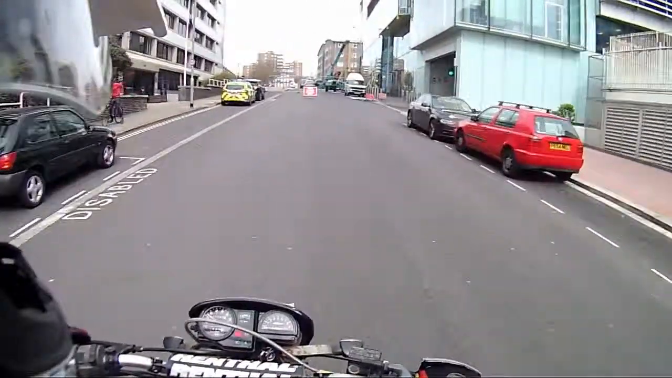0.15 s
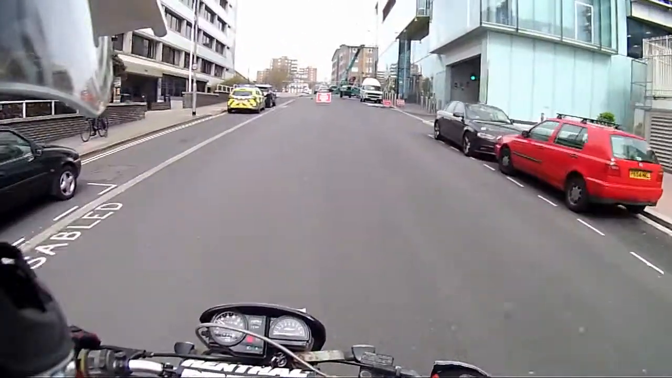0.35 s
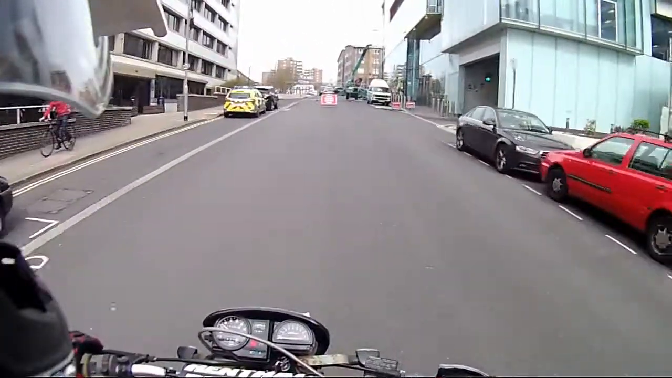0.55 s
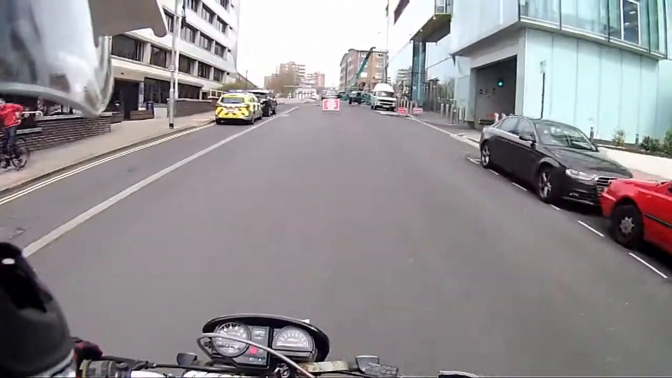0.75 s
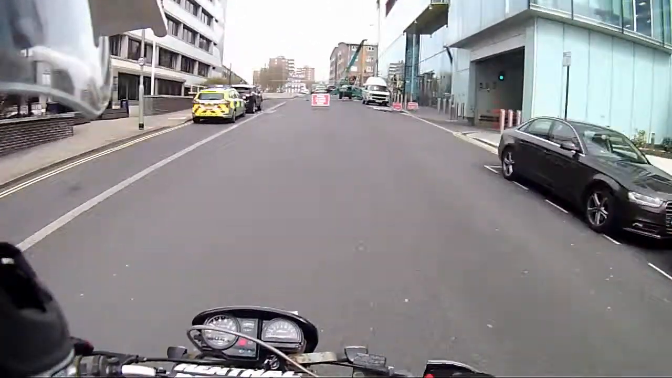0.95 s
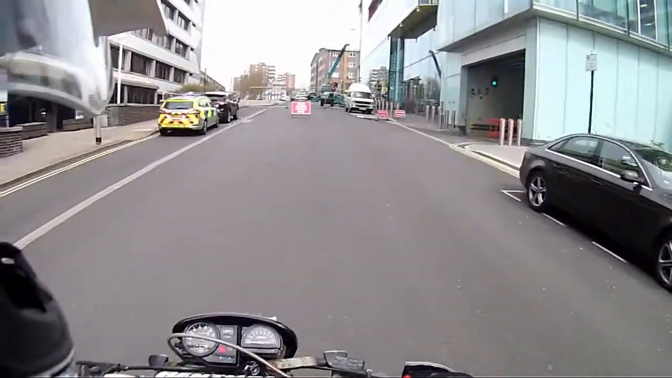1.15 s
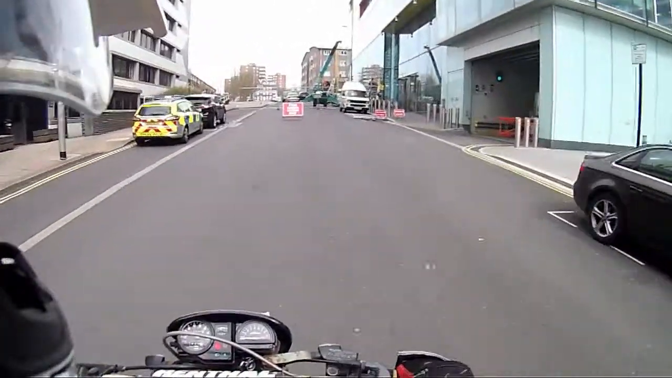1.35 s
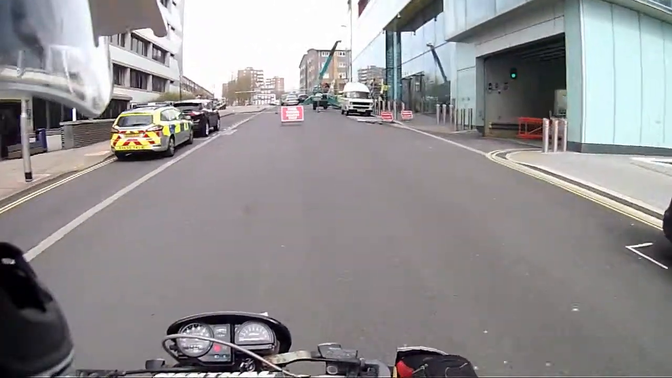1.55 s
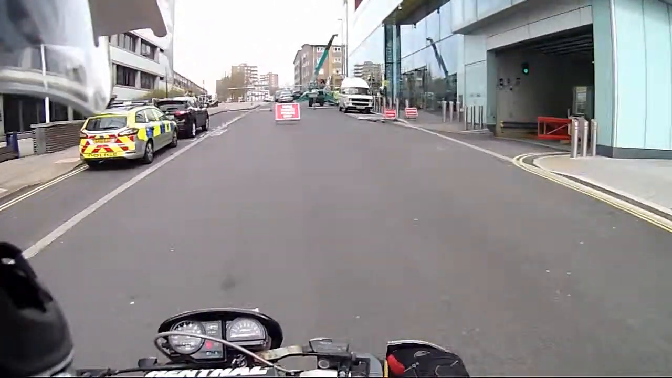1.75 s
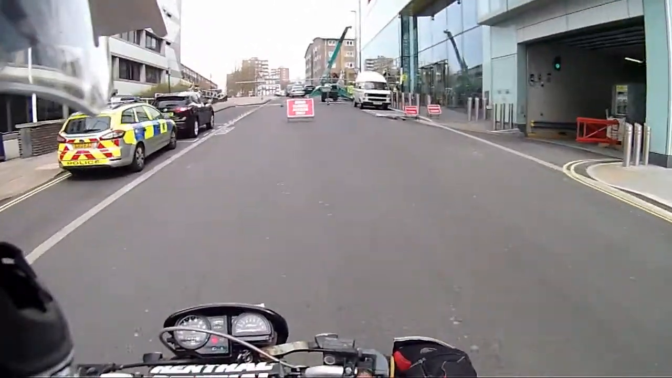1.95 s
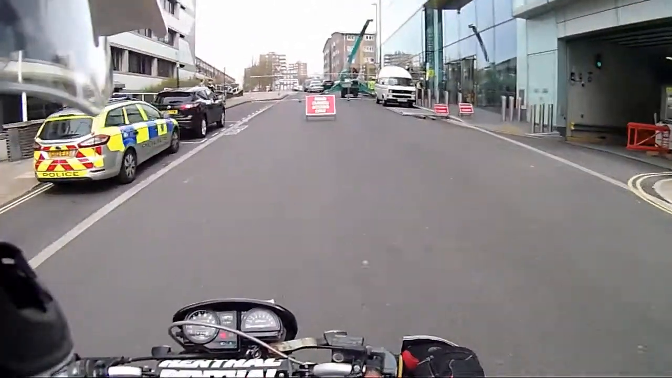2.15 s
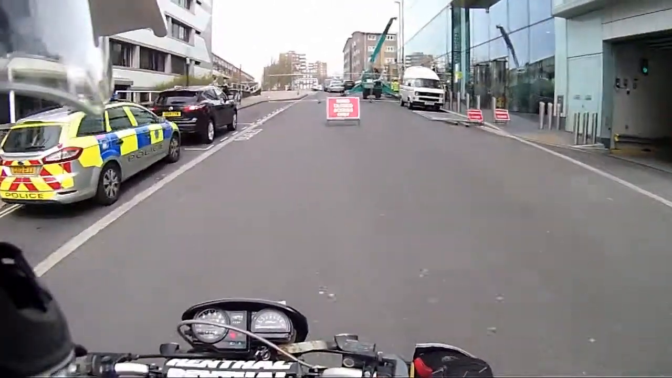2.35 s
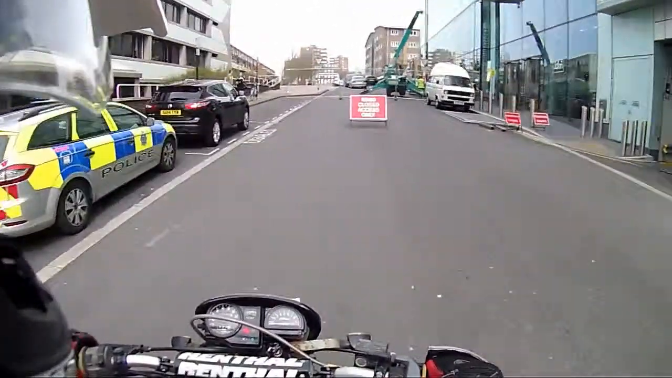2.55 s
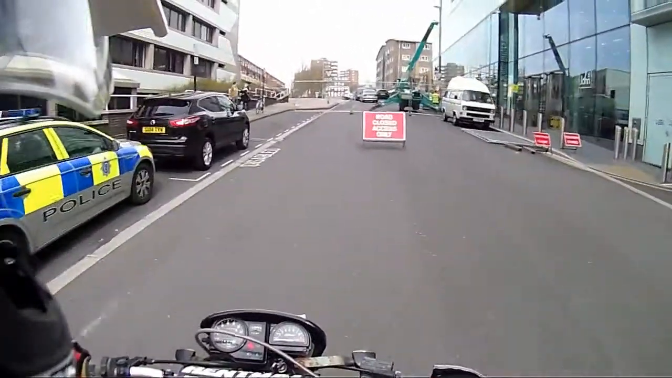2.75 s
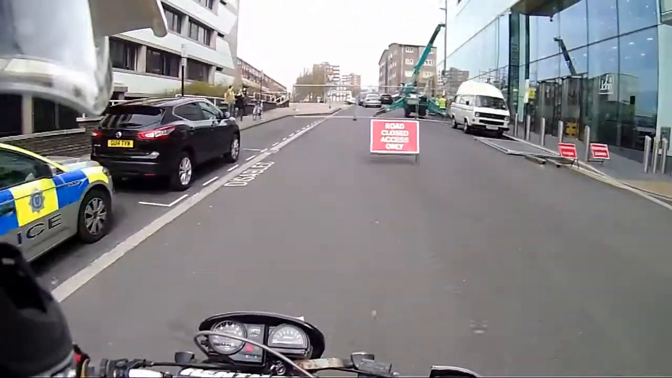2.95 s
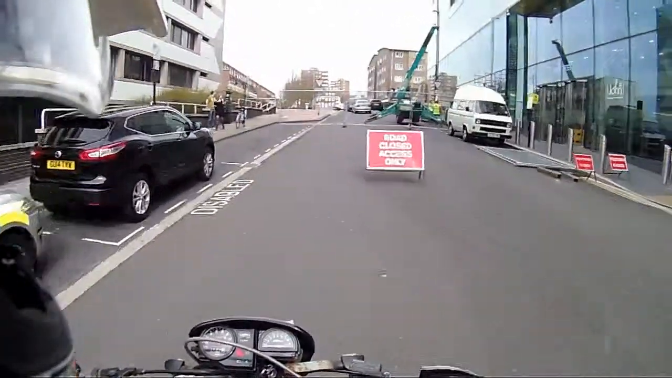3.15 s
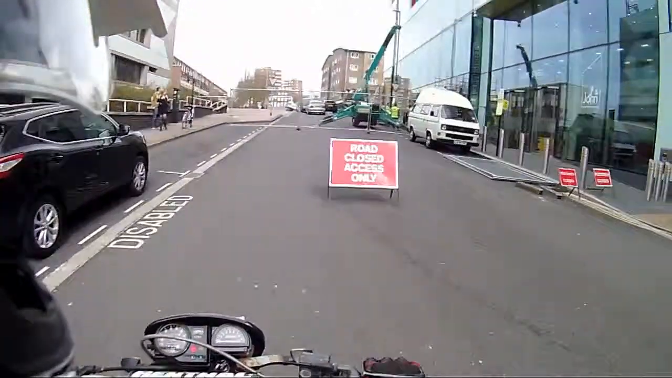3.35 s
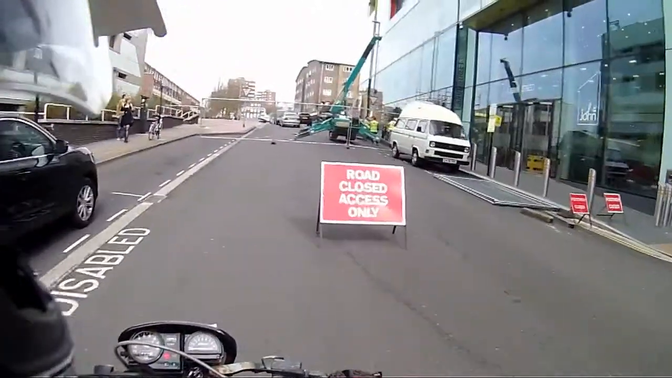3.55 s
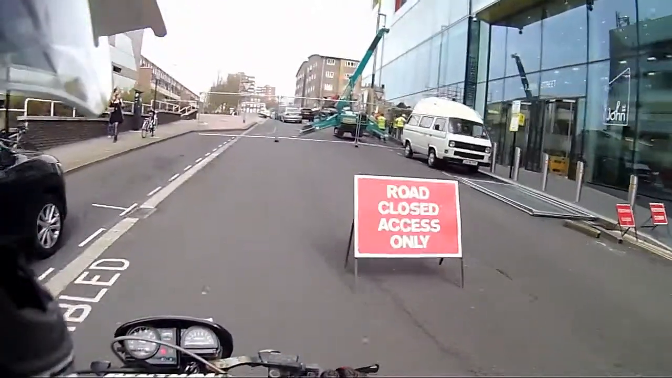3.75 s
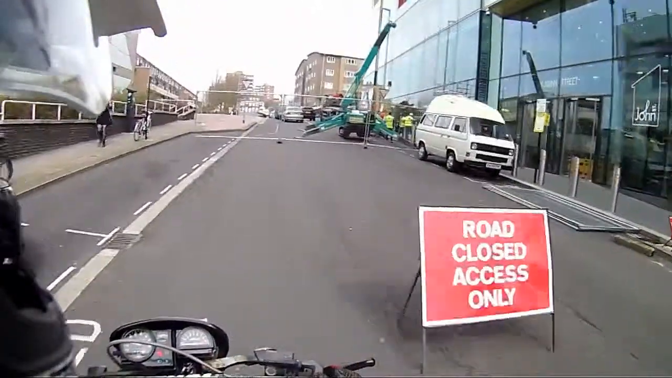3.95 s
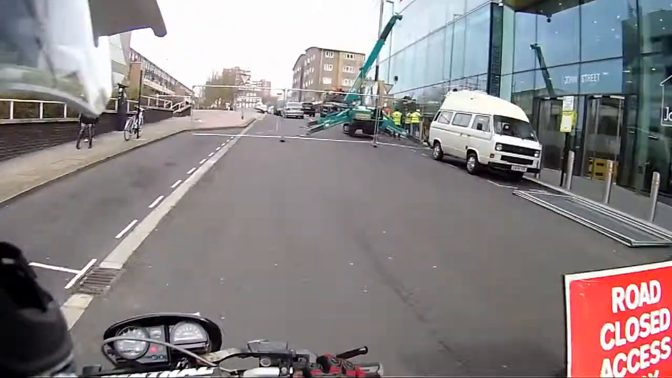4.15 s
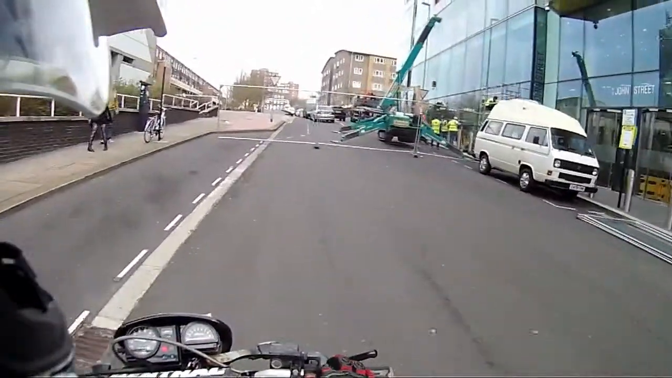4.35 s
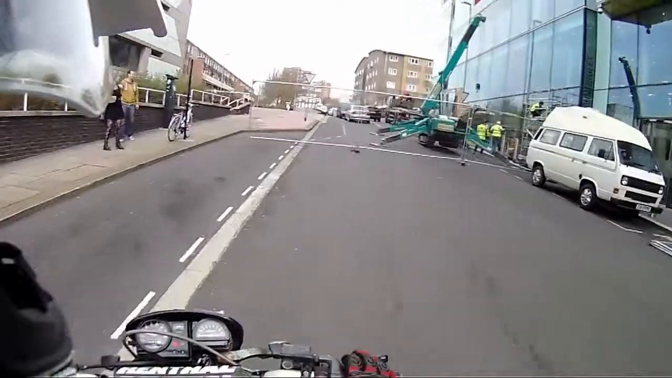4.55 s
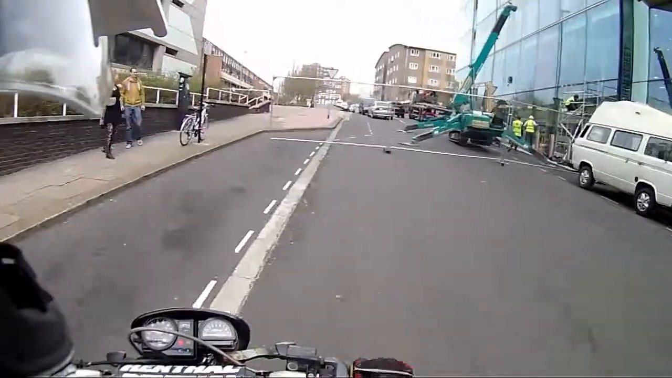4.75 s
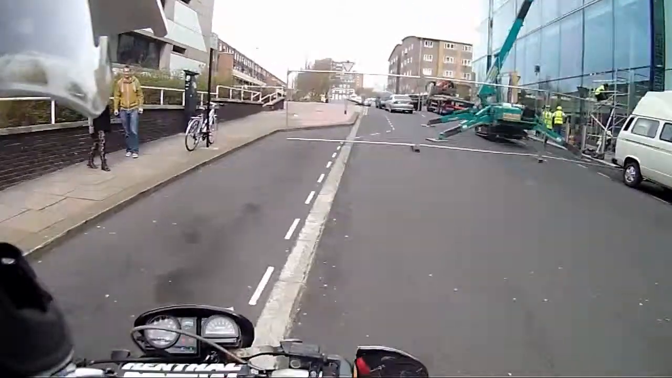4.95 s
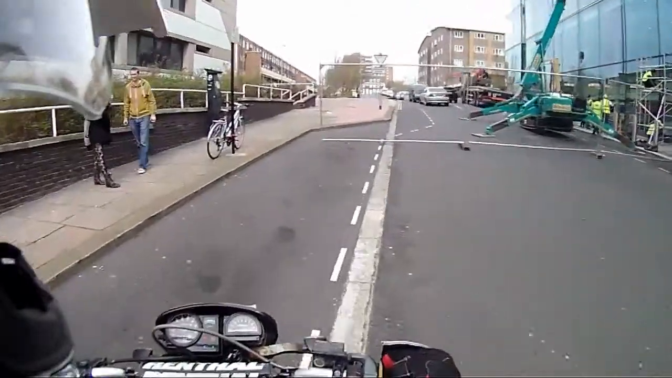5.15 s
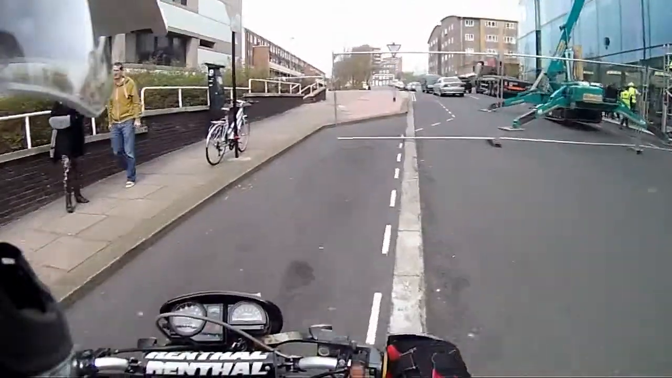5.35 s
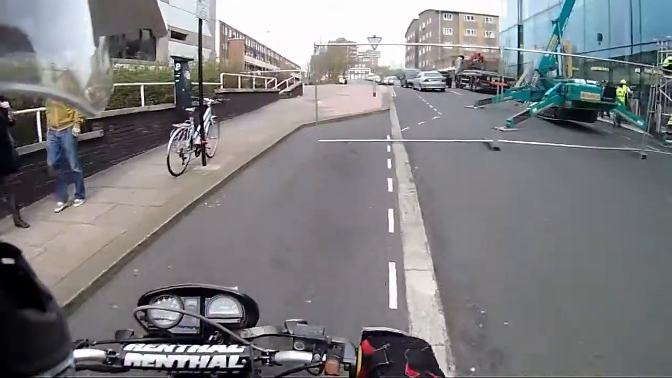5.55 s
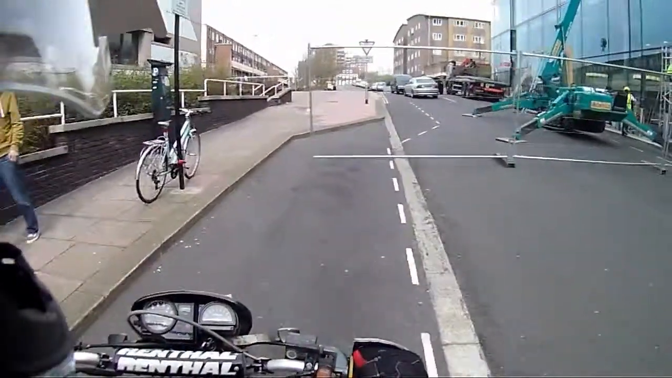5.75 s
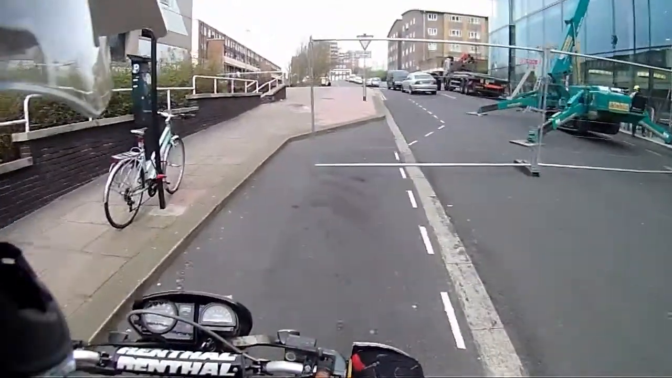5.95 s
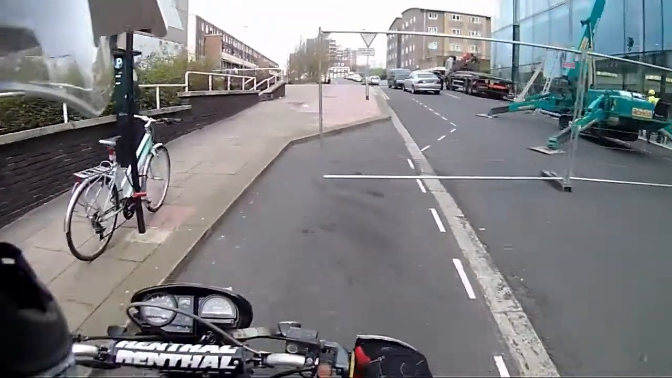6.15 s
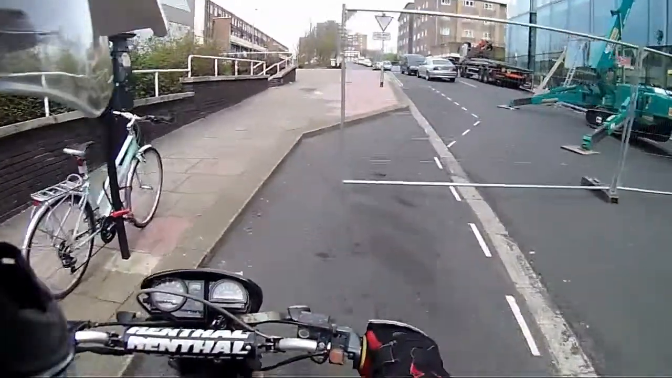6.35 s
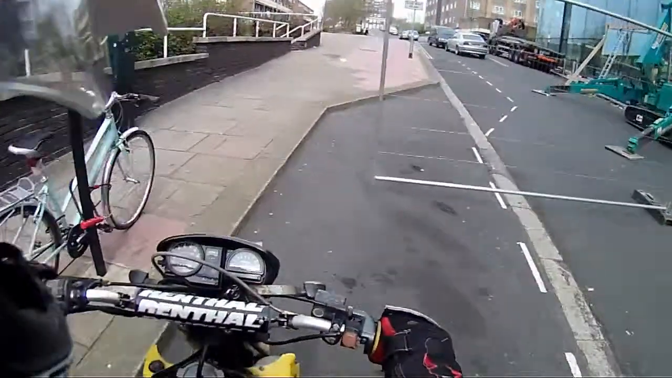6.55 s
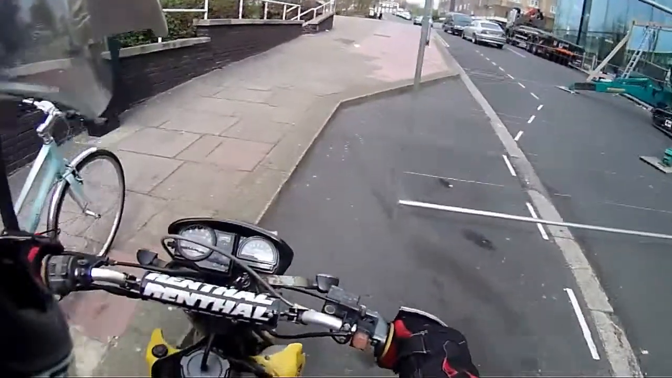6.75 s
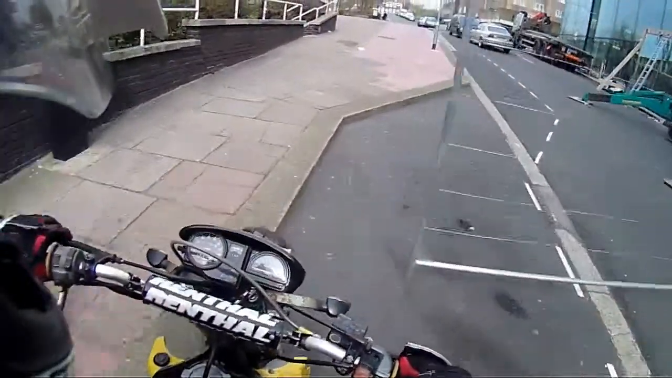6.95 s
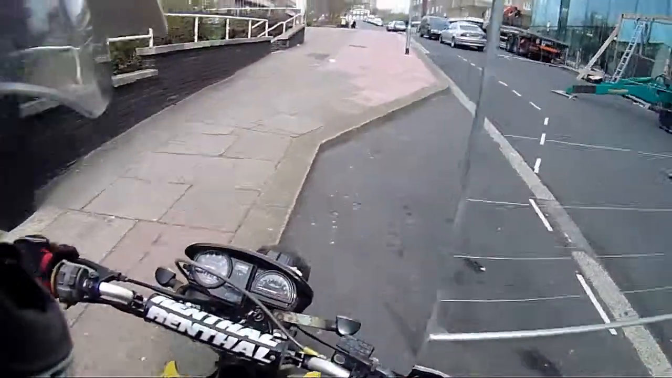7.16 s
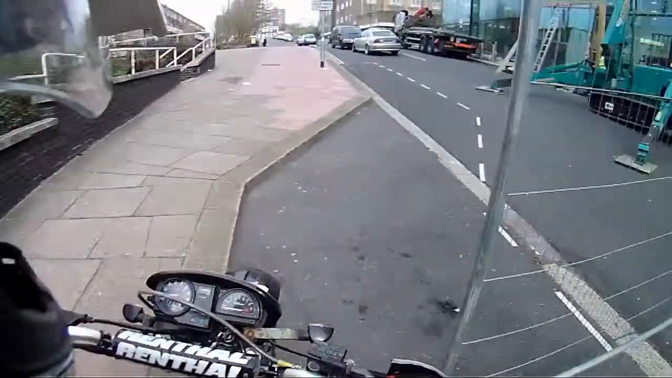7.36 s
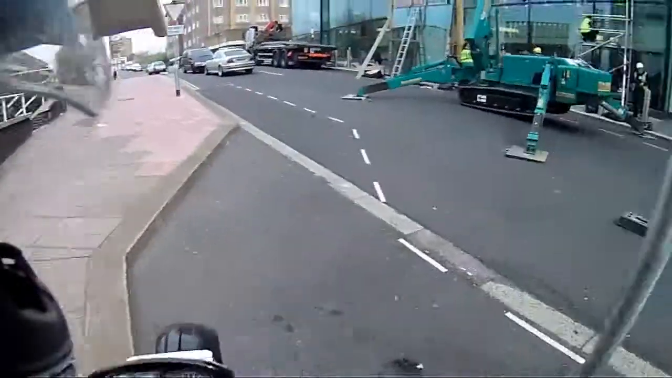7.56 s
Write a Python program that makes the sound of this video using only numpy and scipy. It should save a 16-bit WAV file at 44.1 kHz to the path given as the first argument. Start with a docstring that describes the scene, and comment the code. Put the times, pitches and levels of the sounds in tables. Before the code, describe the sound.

Wind rumbles in gusts on a rider's microphone as a motorcycle slows down on a town street. The engine hums and whines lower and lower, with tyre roar and small metallic ticks. Midway the brakes give a soft groan and hiss and the bike knocks over a bump. The engine drops to a low putter, and faint, thin brake squeaks come through as the wind eases.

```python
"""Motorcycle coasting and braking

A single-cylinder motorcycle slows down a city street, throttle shut, heard from the rider's helmet.
Crank harmonics filtered by pipe resonances, gear whine and valve clatter sink with the engine speed,
under eddies buffeting the microphone and tyre roar. Loose parts rattle and bumps thump; the clutch is
pulled, and brake friction rubs, groans and squeaks thinly. A faint distant town lies behind."""
import sys
import numpy as np
from scipy import signal
from scipy.fft import rfft, irfft
from scipy.io import wavfile
from scipy.ndimage import uniform_filter1d

SR = 44100
rng = np.random.default_rng(int(sys.argv[2]) if len(sys.argv) > 2 else 0)


def unload_audio(sound):
    """Save the sound as a 16-bit wav file, at the path given as the first command line argument."""
    columns = np.transpose(np.atleast_2d(sound))
    # keep every value between -1 and 1, then stretch to whole-number steps
    steps = np.round(np.clip(columns, -1, 1) * 32767)
    wavfile.write(sys.argv[1], SR, steps.astype(np.int16))


N = 335160
TIME = np.arange(N) / SR

# resonances of exhaust and airbox: f/Hz, width/Hz, level/dB
PIPE_MODES = [(232, 22, -1), (268, 24, 1.5), (308, 25, 1), (391, 25, -.5), (431, 31, -2), (478, 45, -6),
              (567, 34, .5), (627, 48, -1), (786, 57, -10)]


def undb(db):
    """Amplitude ratio of a level in decibels."""
    return 10 ** (np.asarray(db) / 20)


def unit(x):
    """Normalisation to rms 1."""
    return x / np.sqrt(np.mean(x ** 2))


def curve(table):
    """Linear interpolation of (t/s, value) rows at every sample."""
    return np.interp(TIME, *np.transpose(table))


def colour(x, points):
    """Spectral shaping by (f/Hz, level/dB) points, falling 12 dB an octave beyond them; rms 1."""
    hz, db = np.transpose(points)
    f = np.maximum(np.fft.rfftfreq(len(x), 1 / SR), 1)
    skirts = np.minimum(f / hz[0], 1) ** 2 * np.minimum(hz[-1] / f, 1) ** 2
    gain = undb(np.interp(np.log(f), np.log(hz), db))
    return unit(irfft(rfft(x) * skirts * gain, len(x)))


def resonance(f, hz, width):
    """Complex response of a damped oscillator driven at frequency f."""
    return 1j * f * width / (hz ** 2 - f ** 2 + 1j * f * width)


def ring(x, modes):
    """Modal superposition: x drives (f/Hz, width/Hz, level/dB) modes; rms 1."""
    f = np.fft.rfftfreq(N, 1 / SR)
    response = sum(undb(db) * resonance(f, hz, width) for hz, width, db in modes)
    return unit(irfft(rfft(x) * response, N))


def noise():
    """Gaussian white noise."""
    return rng.standard_normal(N)


def walk(rate):
    """Random fluctuation of rms 1, low-passed at rate Hz."""
    coarse = rng.standard_normal(N // 20)
    f = np.fft.rfftfreq(len(coarse), 20 / SR)
    slow = unit(irfft(rfft(coarse) / (1 + (f / rate) ** 4), len(coarse)))
    return np.interp(np.arange(N), 20 * np.arange(len(slow)), slow)


def swell(middle_s, length_s):
    """Bell-shaped envelope, 1 at its middle."""
    return np.exp(-np.abs(2 * (TIME - middle_s) / length_s) ** 3)


def add(out, s, sound):
    """Superposition of a sound starting at time s."""
    i = int(s * SR)
    out[i:i + len(sound)] += sound[:N - i]


def speed_gain(speed_ratio, cruise_db, doubling_db):
    """Power law: the level changes by doubling_db for each doubling of speed relative to cruise."""
    return undb(cruise_db + doubling_db * np.log2(speed_ratio))


def engine_gain(crank_hz, cruise_db, doubling_db, throttle_db, clutch_drop_db):
    """Radiation follows speed and load: the throttle finishes closing, later the clutch is pulled."""
    cruise_hz, shut_s, clutch_s, fade_s = 70, .48, 4.34, .74
    throttle = np.maximum(1 - TIME / shut_s, 0)
    released = 1 - np.exp(-np.maximum(TIME - clutch_s, 0) / fade_s)
    load_db = throttle_db * throttle - clutch_drop_db * released
    return speed_gain(crank_hz / cruise_hz, cruise_db, doubling_db) * undb(load_db)


def drone(turns, crank_hz, wander_db=1.7, roughness=.25):
    """Forced resonance: each crank harmonic swells as it slides through a pipe mode."""
    # harmonics: crank order, then level/dB at high, middling and low revs
    harmonics = [(3, 6, 3, -3), (4, 0, 5.5, -4), (5, 3.5, 7.5, -4), (6, 2.5, -.5, -2), (7, -1, -3, 0),
                 (8, 1.5, -2, 3), (9, -5, -2, -6), (10, -7, -5, -8), (11, -6, -2.5, -6), (12, -6, -2, 1),
                 (13, -6, -4, 0), (14, -8, -6, -3), (15, -8, -6, -4), (18, -12, -8, 1), (20, -12, -8, 6)]
    # those three crank speeds: f/Hz
    revs_hz = [76, 63, 52]
    unevenness = .02 * np.clip((47 - crank_hz) / 10, .08, 1.5)  # slow turns break up the tones
    angle = turns + unevenness * walk(25)
    tones = 0
    for order, *levels in harmonics:
        db = np.interp(crank_hz, revs_hz[::-1], levels[::-1])
        pipe_power = sum(np.abs(undb(mode_db) * resonance(order * crank_hz, f, width)) ** 2
                         for f, width, mode_db in PIPE_MODES)
        amplitude = np.sqrt(2 * pipe_power) * undb(db + wander_db * walk(3.5))
        tones += amplitude * np.sin(2 * np.pi * (order * angle + rng.random()))
    brief_dip = undb(-4.5 * swell(middle_s=2.72, length_s=.45))
    gain = engine_gain(crank_hz, cruise_db=-46.5, doubling_db=7.5, throttle_db=0, clutch_drop_db=16.5)
    return tones * (1 + roughness * walk(25)) * gain * brief_dip


def burble(turns, crank_hz, decay_cycles=.72, scatter_db=3):
    """Pulsed excitation: every second turn an uneven puff of gas drives the pipe modes."""
    puffs = np.exp(-(turns / 2 % 1) / decay_cycles) * undb(scatter_db * walk(21))
    gain = engine_gain(crank_hz, cruise_db=-50, doubling_db=2, throttle_db=2, clutch_drop_db=16)
    return ring(noise() * puffs, PIPE_MODES) * gain


def gear_whine(turns, crank_hz, waver_cycles=.15):
    """Modulation: the uneven crank gives the mesh tone sidebands, loudest at housing resonances."""
    # tooth mesh frequency, snatched to and fro by the slack chain: t/s, f/Hz
    mesh = [(0, 1570), (.17, 1540), (.23, 1570), (.29, 1500), (.38, 1512), (.45, 1475), (.52, 1440),
            (.57, 1462), (.64, 1402), (.73, 1490), (.82, 1428), (1, 1420), (1.09, 1383), (1.15, 1420),
            (1.25, 1365), (1.34, 1345), (1.41, 1335), (1.5, 1358), (1.62, 1300), (1.7, 1312), (1.9, 1255),
            (1.99, 1248), (2.05, 1273), (2.16, 1202), (2.35, 1215), (2.53, 1143), (2.65, 1174),
            (2.88, 1032), (3.07, 1045), (4, 822), (6, 560), (7.6, 500)]
    # mesh tone and sidebands: offset/crank orders
    offsets = [-3, -2, -1, 0, 1, 2, 3]
    # strength of each: level/dB
    levels = [-3, -8, -3.5, 2.5, -2, -7, -8]
    # radiation of the gear housing: f/Hz, level/dB
    housing = [(850, -17), (980, -13), (1040, -7), (1100, -10), (1150, -4.5), (1250, -4.5), (1295, -10),
               (1355, -3), (1420, 4.5), (1475, 0), (1510, -13), (1600, -16)]
    mesh_hz = curve(mesh)
    chatter = .055 * (60 / crank_hz) ** 6 * walk(45)  # phase jitter grows as the engine slows
    teeth = np.cumsum(mesh_hz) / SR + chatter
    whine = 0
    for offset, db in zip(offsets, levels):
        housing_db = np.interp(mesh_hz + offset * crank_hz, *np.transpose(housing))
        amplitude = undb(housing_db + db + 2 * walk(15))
        whine += amplitude * np.sin(2 * np.pi * (teeth + offset * turns + waver_cycles * walk(3.7)))
    gain = engine_gain(crank_hz, cruise_db=-46.5, doubling_db=3, throttle_db=-4.5, clutch_drop_db=21)
    return whine * gain


def clatter(turns, crank_hz, decay_turns=.48, tap_depth=.55):
    """Periodic impact: valves and piston tap once a turn, pulsing hiss and whirr and ringing the cases."""
    # blurred gear overtones: crank order, blur/Hz, level/dB, loudest at crank f/Hz, crank range/Hz
    whirrs = [(40, 200, -17, 55, 12), (97, 110, -11, 56, 4), (100, 160, -12.5, 49, 4),
              (152, 220, -16, 48, 3), (180, 340, -11, 43.5, 3), (186, 220, -11, 39.7, 1.3)]
    # mechanical noise: f/Hz, level/dB
    spectrum = [(1000, 5.5), (1700, 0), (2460, 1.5), (2620, -3.5), (3020, -3.5), (3700, -14), (4880, -5.5),
                (5710, -8), (6260, -10.5), (7600, -3), (8410, -8.5), (10100, -10), (12000, -21),
                (13000, -23), (15500, -34)]
    # engine cases and fins: f/Hz, width/Hz, level/dB
    case_modes = [(1266, 38, -2), (1370, 31, 16), (1412, 18, 18), (2480, 30, 2), (2776, 50, 0),
                  (3350, 30, -6), (4740, 96, 0), (5290, 180, -2.5), (5570, 40, 2), (6660, 54, 1),
                  (7300, 110, -8)]
    taps = 1 + tap_depth * np.exp(-(turns % 1) / decay_turns) * undb(1.1 * walk(25))
    taps = unit(taps) * undb(.6 * walk(8))
    whirr = 0
    for order, blur_hz, db, loudest_hz, range_hz in whirrs:
        nearness = np.exp(-((crank_hz - loudest_hz) / range_hz) ** 2)
        whirr += undb(db) * nearness * walk(blur_hz) * np.sin(2 * np.pi * order * turns)
    direct = colour((noise() + whirr) * taps, spectrum)
    ringing_db = np.interp(crank_hz, [27, 38], [-11, -5])  # soft blows near idle ring less
    cases = undb(ringing_db) * ring(noise() * taps, case_modes)
    gain = engine_gain(crank_hz, cruise_db=-51, doubling_db=6.5, throttle_db=7.5, clutch_drop_db=9.5)
    return (direct + cases) * gain


def buffeting(spectrum, steadiness=.65, flutter_db=1.7):
    """Turbulent pressure: eddy noise, its envelope partly evened out, then fluttering; rms 1."""
    eddies = colour(noise(), spectrum)
    envelope = np.sqrt(uniform_filter1d(eddies ** 2, SR // 10))
    return unit(eddies / envelope ** steadiness * undb(flutter_db * walk(5.9)))


def wind(speed_ratio):
    """Turbulence at the microphone grows with road speed, swelling in gusts and dipping in lulls."""
    # gusts and lulls: middle t/s, length/s, lift of large eddies/dB, lift of small eddies/dB
    gusts = [(0.1, 0.1, 9, 2), (0.446, 0.095, -1, 0), (0.787, 0.1, 6, 0.5), (1.283, 0.29, 2.5, 6.5),
             (1.67, 0.58, 6.5, 6), (1.83, 0.12, 7.5, 1), (2.064, 0.34, 6, 4.5), (2.296, .08, -5, 0.5),
             (2.62, .16, -4, 1), (2.77, 0.075, 4.5, 2.5), (2.96, .1, -2, -0.5), (3.108, 0.11, 5, -3),
             (3.236, 0.11, 7.5, -2), (3.517, 0.32, 5, 5.5), (3.77, 0.11, 0, -5.5), (3.888, 0.039, 19.5, 6),
             (3.968, 0.051, 9.5, 12.5), (4.106, 0.25, 13, 7.5), (4.35, 0.24, 6.5, 12), (4.61, 0.29, 8.5, 9),
             (4.785, .1, 4, 6), (5.065, 0.33, 10.5, 3.5), (5.656, 0.45, 8, 1), (5.843, 0.053, 10.5, 6.5),
             (5.973, 0.075, 2, 7), (6.128, 0.17, 10, 8.5), (6.26, 0.07, 8, 9), (6.544, 0.55, 5.5, 15.5),
             (7.488, 0.054, 11, 2)]
    # large, slow eddies: f/Hz, level/dB
    large_spectrum = [(12, -10), (24, 0), (42, 0), (55, -4), (75, -16), (150, -40)]
    # small, quick eddies: f/Hz, level/dB
    small_spectrum = [(35, -30), (60, -1), (85, -2.5), (125, -4), (190, -11.5), (280, -18), (450, -30),
                      (900, -45.5), (2500, -64)]
    large_lift = undb(sum(db * swell(s, length) for s, length, db, _ in gusts))
    small_lift = undb(sum(db * swell(s, length) for s, length, _, db in gusts))
    large = buffeting(large_spectrum) * speed_gain(speed_ratio, cruise_db=-32.5, doubling_db=6.8)
    small = buffeting(small_spectrum) * speed_gain(speed_ratio, cruise_db=-29.5, doubling_db=12.74)
    return large * large_lift + small * small_lift


def tyres(speed_ratio):
    """Rolling noise: a flickering broadband roar that follows a power of road speed."""
    # tyre roar: f/Hz, level/dB
    spectrum = [(100, -77), (300, 4.5), (600, 8), (780, 4), (900, -5.5), (1150, -1), (1450, 0),
                (1700, -8.5), (2500, -20), (5000, -23.5)]
    gain = speed_gain(speed_ratio, cruise_db=-42, doubling_db=10.24)
    return colour(noise(), spectrum) * gain * undb(1.1 * walk(17))


def singing_metal(blur_hz=28):
    """Narrow-band resonance: thin shaken parts ring briefly, each in one unsteady mode."""
    # ringing parts: middle t/s, length/s, f/Hz, level/dB
    modes = [(.2, .36, 7860, -59), (.35, .32, 7445, -60.5), (.6, .32, 9090, -65.5), (1.15, .8, 6670, -70)]
    out = np.zeros(N)
    for s, length, hz, db in modes:
        amplitude = undb(db) * swell(s, length) * walk(blur_hz)
        out += amplitude * np.sin(2 * np.pi * (hz * TIME + .2 * walk(blur_hz)))
    return out


def loose_parts():
    """Contact noise: single ticks and rattles of many small impacts, each part metallic, part dull."""
    # ticks of loose parts: t/s, level/dB, relative knock level/dB, decay/s
    ticks = [(.171, -46, 1, .006), (.328, -40, -1, .008), (.544, -39.5, 7, .008), (.849, -42, 5, .007),
             (1.29, -42, 1, .007), (2.627, -46.5, 0, .007), (2.786, -51, 6, .008), (4.301, -40, -15, .0022),
             (4.713, -54, 5, .006), (5.276, -55, -5, .008), (5.724, -58, -1, .01), (5.791, -56, -2, .009),
             (5.854, -54.5, 8, .007), (6.165, -57, -7, .006), (7.033, -61, 3, .007),
             (7.157, -63, -12, .004)]
    # rattles of chain and controls: t/s, level/dB, length/s, relative knock level/dB
    rattles = [(3.144, -55, 0.052, 10), (3.377, -55, 0.04, 3), (3.602, -54, 0.052, 11),
               (3.7, -60.5, 0.033, 13.5), (5.395, -59.5, 0.033, 0), (6.05, -60.5, 0.02, -12),
               (6.067, -58, 0.06, -16), (6.409, -59.5, 0.045, 4.5), (6.722, -61, 0.044, 1),
               (7.371, -58.5, 0.015, 1), (7.439, -63.5, 0.087, 3)]
    # bright contact noise: f/Hz, level/dB
    bright_spectrum = [(1500, 4), (2600, 10), (3300, 7), (4000, -1), (5000, 7.5), (6200, 3), (7600, 7),
                       (8700, 1), (9600, 5), (12000, -4), (16000, -20)]
    # dull knock: f/Hz, level/dB
    knock_spectrum = [(200, 15), (600, 15.5), (1100, 12), (2000, 7.5), (3200, -1.5), (5000, -6)]
    # chain and brake metal: f/Hz, width/Hz, level/dB
    metal_modes = [(2670, 55, -13), (2840, 39, -3), (3460, 140, 0), (6580, 140, -3), (7320, 78, 5.5),
                   (7840, 27, -2), (8200, 32, 4), (8500, 66, 2)]
    bright, dull = np.zeros(N), np.zeros(N)
    t = TIME[:SR // 4]
    for s, db, knock_db, decay in ticks:
        blow = undb(db) * np.minimum(t / (.25 * decay), 1) * np.exp(-t / decay)
        add(bright, s, blow)
        add(dull, s, blow * undb(knock_db))
    for s, db, length, knock_db in rattles:
        shake = undb(db) * np.minimum(t / (.3 * length), 1) * np.exp(-(t / length) ** 4)
        add(bright, s, shake)
        add(dull, s, shake * undb(knock_db))
    contacts = unit(undb(1.8 * walk(300)))
    metal = unit(colour(noise(), bright_spectrum) + undb(-3) * ring(noise(), metal_modes))
    return contacts * (bright * metal + dull * colour(noise(), knock_spectrum))


def bumps(thump_rise_s=.0026, thump_decay_s=.017, clank_decay_s=.0095):
    """Damped transients: each bump thumps the suspension and makes the handlebar clank."""
    # road bumps: t/s, thump level/dB, clank level/dB
    impacts = [(4.431, -37, -42), (5.855, -52, -61), (7.369, -65, -52), (7.417, -47, -62)]
    # suspension thump: f/Hz, level/dB
    spectrum = [(130, 6), (230, 5.5), (450, -20), (1200, -60)]
    # handlebar: f/Hz, width/Hz, level/dB
    bar_modes = [(607, 30, 0), (966, 73, 16), (1870, 30, 7), (3120, 15, -13.5), (3680, 80, -31)]
    thump, clank = np.zeros(N), np.zeros(N)
    t = TIME[:SR // 4]
    for s, thump_db, clank_db in impacts:
        add(thump, s, undb(thump_db) * np.minimum(t / thump_rise_s, 1) * np.exp(-t / thump_decay_s))
        add(clank, s, undb(clank_db) * np.exp(-t / clank_decay_s))
    return thump * colour(noise(), spectrum) + clank * ring(noise(), bar_modes)


def brake_rub(rise_share=.4, release_s=.061, flicker_db=1):
    """Sliding friction: the pad hisses on the disc as its pressure rises, holds and dies away."""
    # rubs of the pad: start t/s, length/s, level/dB
    rubs = [(3.975, 0.36, -62), (4.45, 0.16, -60), (4.95, 0.66, -74), (6.098, 0.095, -72),
            (6.148, 0.42, -67.5), (6.234, 0.037, -67), (6.502, 0.045, -73), (6.586, 0.24, -75),
            (6.702, 0.99, -72.5), (7.207, 0.079, -75)]
    # friction hiss: f/Hz, level/dB
    spectrum = [(2500, -35), (4800, -1), (6000, -13), (7500, -2.5), (9000, -1.5), (10500, 4), (12000, -7.5),
                (15500, -10)]
    pressure = np.zeros(N)
    for s, length, db in rubs:
        rise = np.clip((TIME - s) / (rise_share * length), 0, 1)
        release = np.exp(-np.maximum(TIME - s - length, 0) / release_s)
        pressure += undb(db) * rise * release
    return pressure * undb(flicker_db * walk(44)) * colour(noise(), spectrum)


def brake_squeaks():
    """Friction-excited vibration: the pad catches in thin glides that waver in pitch and level."""
    # squeaks: t/s, length/s, start f/Hz, end f/Hz, level/dB, scratchiness (0-1)
    squeaks = [(3.25, .11, 11600, 10500, -67.5, .8), (3.36, .06, 10300, 11500, -67.5, .8),
               (3.43, .09, 10500, 11800, -65.5, .8), (5.05, .07, 11000, 11900, -68, 1),
               (5.18, .05, 13000, 12000, -73, 1), (5.28, .16, 11000, 11500, -71, 1),
               (5.56, .06, 11300, 10700, -71, .6), (7.05, .03, 12400, 13800, -73, .3),
               (7.06, .09, 10100, 9700, -70, .25), (7.2, .09, 9600, 11300, -67.5, .4),
               (7.29, .05, 13800, 12400, -73, .6)]
    out = np.zeros(N)
    wobble = .0315 * walk(45) + .048 * walk(700)
    grip_db = 6 * walk(260)
    for s, length, start_hz, end_hz, db, scratch in squeaks:
        n = int(length * SR)
        span = slice(int(s * SR), int(s * SR) + n)
        hz = np.linspace(start_hz, end_hz, n) * (1 + scratch * wobble[span])
        grip = unit(undb(scratch * grip_db[span]))
        envelope = undb(db) * grip * np.sqrt(2 * np.hanning(n))
        add(out, s, envelope * np.sin(2 * np.pi * np.cumsum(hz) / SR))
    return out


def brake_groan():
    """Modal excitation: the biting pad makes the brake's low modes ring."""
    # bites of the pad: middle t/s, length/s, level/dB
    bites = [(4.248, 0.71, -49), (5.1, 0.085, -55.5)]
    # brake disc: f/Hz, width/Hz, level/dB
    disc_modes = [(525, 17, -15), (607, 7.8, 2.5), (719, 21, -0.5), (800, 11, 4)]
    return ring(noise(), disc_modes) * sum(undb(db) * swell(s, length) for s, length, db in bites)


def scrape(peak_s=7.29, rise_s=.17, fall_s=.04, peak_db=-56.5, grain_db=2):
    """Amplitude-modulated noise: a dry, grainy rustle near the end grows slowly and stops quickly."""
    # rustle: f/Hz, level/dB
    spectrum = [(500, 16), (800, 13), (1400, -1), (2200, 3), (3800, 0), (4750, 2), (5800, -7), (7000, -3),
                (12000, -16)]
    t = TIME - peak_s
    envelope = undb(peak_db) * np.exp(np.minimum(t / rise_s, -t / fall_s))
    grains = noise() * undb(grain_db * walk(200))
    return envelope * colour(grains, spectrum)


def town(level_db=-65):
    """Stationary ambient noise: the distant town, strongest at low frequencies."""
    # town ambience: f/Hz, level/dB
    spectrum = [(120, 1), (260, -5), (420, -0.5), (580, -8), (900, -6.5), (1400, -8), (2000, -20),
                (3200, -21), (6000, -29)]
    return colour(noise(), spectrum) * undb(level_db)


def scene():
    """Superposition at the helmet: crank speed drives the engine layers, road speed the tyres and wind."""
    # crank rotation: t/s, f/Hz
    crank_speed = [(0, 78.2), (.25, 77), (.55, 72.7), (1, 71.1), (1.2, 68.4), (1.55, 66.8), (2, 62.7),
                   (2.4, 60.2), (3, 52.8), (3.5, 47.3), (4, 41.3), (6, 28), (7.6, 25)]
    # road speed, coasting and then braking: t/s, v/(m/s)
    road_speed = [(0, 10.57), (2.6, 7.22), (4.35, 6.3), (5.3, 4.4), (6.6, 2.37), (7, 1.97), (7.6, 2.07)]
    speed_ratio = curve(road_speed) / 10  # cruise is 10 m/s
    surge_hz, surge_depth, crest_s = 2.17, .008, .75  # the slack chain makes the engine surge
    surge = surge_depth * np.cos(2 * np.pi * surge_hz * (TIME - crest_s))
    crank_hz = curve(crank_speed) * (1 + surge)
    turns = np.cumsum(crank_hz * (1 + .0015 * walk(10))) / SR
    engine = sum(layer(turns, crank_hz) for layer in (drone, burble, gear_whine, clatter))
    street = tyres(speed_ratio) + town() + wind(speed_ratio)
    chassis = singing_metal() + loose_parts() + bumps()
    brake = brake_rub() + brake_squeaks() + brake_groan()
    return (engine + street + chassis + brake + scrape())[None]


def record(dry, hiss_db=-76, whistle_db=-84, whistle_hz=15277, cutoff_hz=15650):
    """Self-noise and band limiting: the electronics add faint hiss and a whistle and cut the top."""
    whistle = undb(whistle_db) * np.sin(2 * np.pi * whistle_hz * TIME)
    hiss = undb(hiss_db) * noise()
    lowpass = signal.ellip(10, .2, 70, cutoff_hz, fs=SR, output="sos")
    return signal.sosfilt(lowpass, dry + whistle + hiss)


dry = scene()
out = record(dry)
unload_audio(out)
```